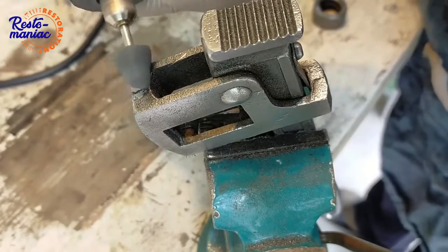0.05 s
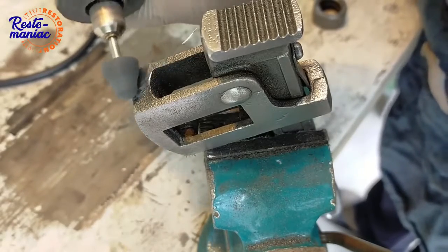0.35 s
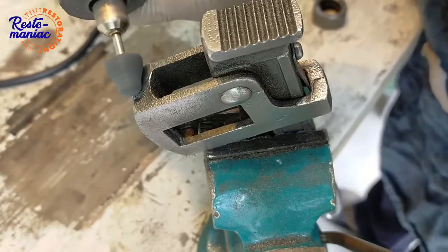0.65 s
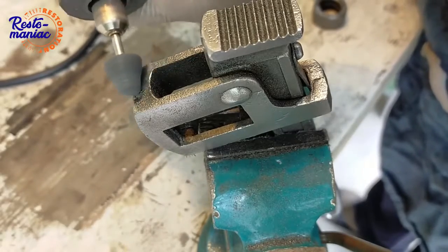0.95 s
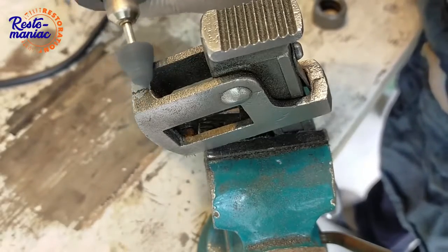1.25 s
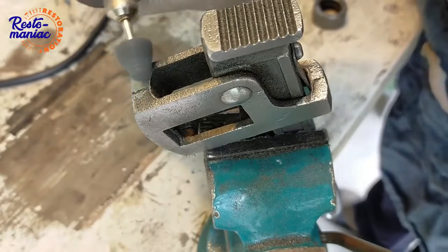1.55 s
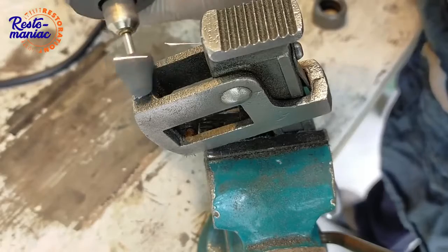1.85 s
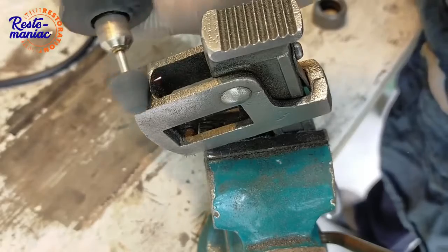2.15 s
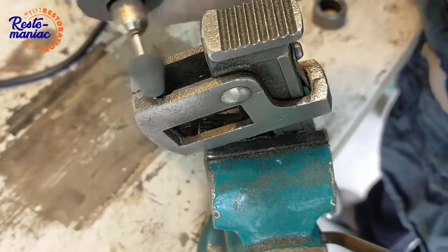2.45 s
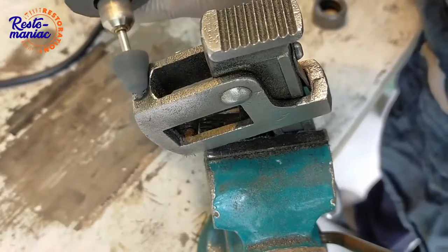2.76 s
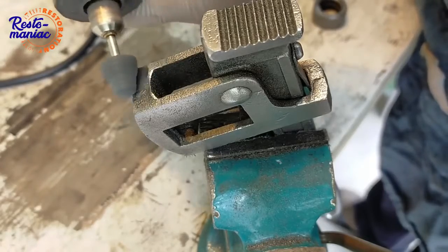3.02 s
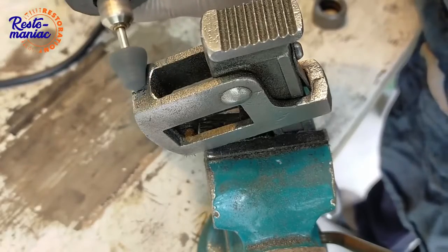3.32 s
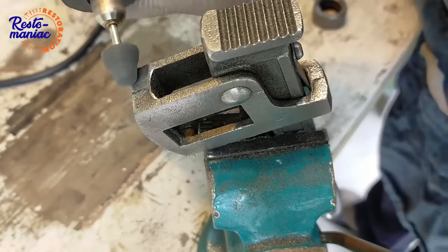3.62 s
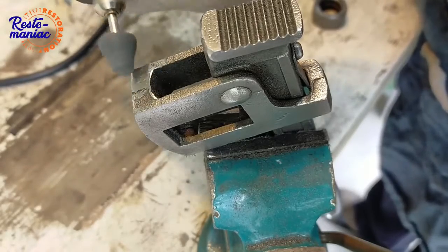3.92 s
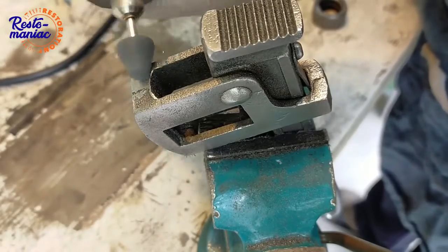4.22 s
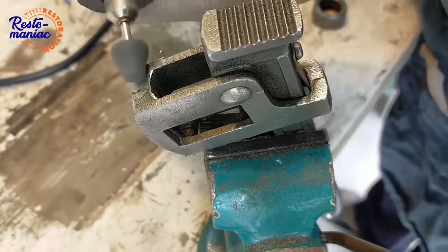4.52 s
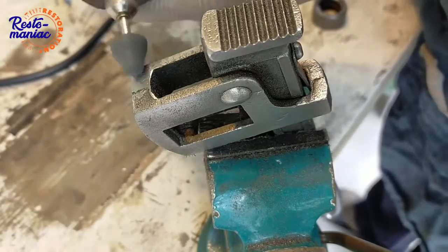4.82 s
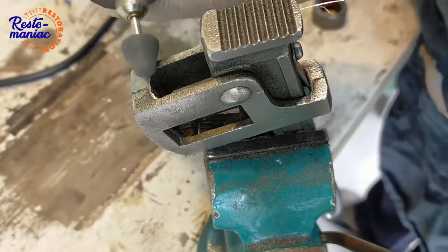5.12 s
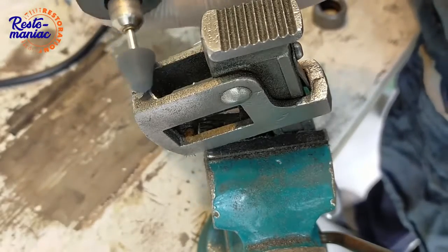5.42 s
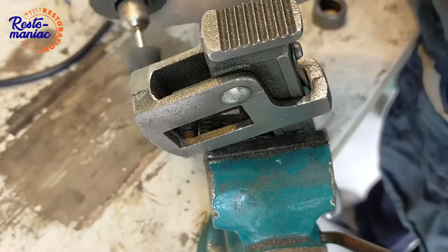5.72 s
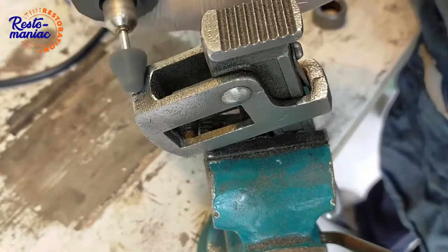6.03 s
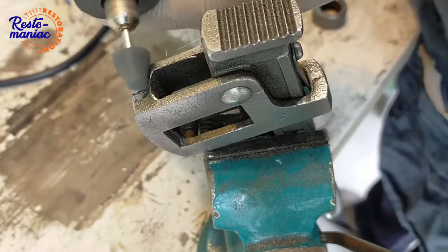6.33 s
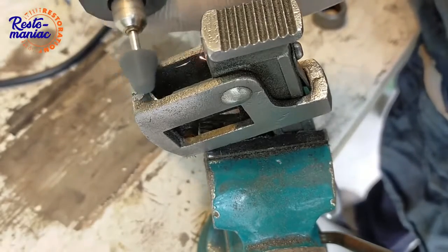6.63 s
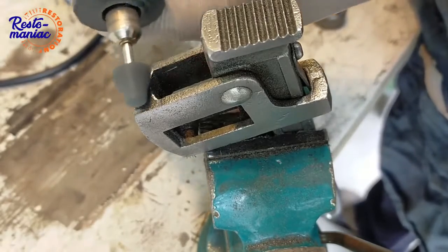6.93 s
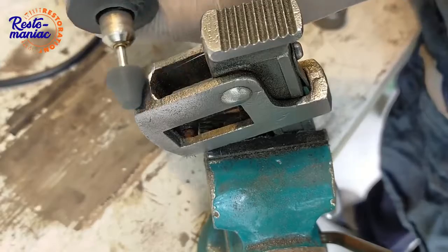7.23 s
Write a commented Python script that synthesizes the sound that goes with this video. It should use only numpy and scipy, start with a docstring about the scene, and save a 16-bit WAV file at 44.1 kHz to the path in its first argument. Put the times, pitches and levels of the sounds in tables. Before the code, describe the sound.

A small rotary tool whines close by, grinding steel with a gritty high screech, its pitch sagging under pressure and rising when lifted.

```python
"""Rotary tool grinding a wrench

A handheld tool grinds rust off a steel wrench in a vise, close by. The uneven stone scrapes
once a turn, so its whine sags under pressure; twice it lifts off and the motor races up.
As the hand presses and eases, the stone digs in, chatters and bounces.
Underneath: the motor's throbbing whirr, its cooling air, the bench and a quiet workshop."""
import sys
import numpy as np
from scipy import signal
from scipy.fft import rfft, irfft, next_fast_len
from scipy.io import wavfile
from scipy.ndimage import uniform_filter1d

SR = 44100
rng = np.random.default_rng(int(sys.argv[2]) if len(sys.argv) > 2 else 0)


def transcribe(u):
    """Save the signal u as a 16-bit wav file named by the first command-line argument.

    u: samples, shape (n,) or (channels, n), limited to [-1, 1]; the rate is SR.
    q: integer samples, one column per channel.
    """
    v = np.clip(np.atleast_2d(u).T, -1, 1)
    q = np.round(v * 32767).astype(np.int16)
    wavfile.write(sys.argv[1], SR, q)


N = 329427
TIME = np.arange(N) / SR

# spectrum of grains tearing steel: f/Hz, gain/dB
GRIT_SPECTRUM = [(300, -30), (900, -24), (1700, -14), (2200, -14), (2700, -10), (3400, -2), (4300, -2),
                 (5400, -2), (6500, -4), (8000, -7), (10000, -11), (15000, -10)]


def grinding(angle, tip, ease_db, grit_db):
    """Whine and grit ring through the steel while the stone touches it."""
    whine = from_db(ease_db) * steel_whine(angle, tip)
    grains = wrench(colour(loose_grit(angle), GRIT_SPECTRUM))
    grit = from_db(-47 + 3.5 * tip + grit_db + 0.65 * drift(4.7)) * rms_one(grains)
    judder_db = 1.3 * drift(22)  # stone bounces slightly in the hand
    return touching() * from_db(judder_db) * (whine + grit)


def steel_whine(angle, tip):
    """The steel radiates the scrape in four bands, each wavering on its own."""
    # stone strikes harder every second turn, growling an octave down: start/s, end/s, depth/1
    bounces = [(.24, .35, 0.2), (2.56, 2.79, 0.3), (4.5, 4.66, 0.1), (5.62, 5.815, 0.17), (6.1, 6.26, 1)]
    # radiation of stone and steel: f/Hz, gain/dB
    radiation = [(900, -22), (1500, -16), (2100, -13), (2800, -12), (3300, -6), (4400, 1.5), (5400, 0.5),
                 (6200, 0), (7200, 5), (9300, -3.5), (10200, -8), (11300, -3.5), (13000, -14.5),
                 (15500, -7.5)]
    # screech, drone, body ring, sizzle: low/Hz, high/Hz
    bands = [(3800, 6400), (950, 2400), (2400, 3800), (6400, 15700)]
    # stone digs in, steel sings: t/s, half-length/s, screech/dB, ring/dB
    digs = [(.05, 0.054, 1.5, 6.5), (.18, 0.045, 2, 4.5), (.44, 0.027, 6.5, -3), (.66, 0.091, 2.5, 3.5),
            (1.01, 0.019, 4.5, 8.5), (1.22, 0.17, 3, -5.5), (1.52, 0.038, 4.5, 8.5),
            (1.87, 0.056, 3.5, 1.5), (2.12, 0.17, 3, -0.5), (2.76, 0.08, 1, 9.5), (3.17, .04, 3, 3.5),
            (3.33, 0.083, 0.5, 6), (3.64, 0.13, 2.5, 1.5), (4.25, 0.01, 5.5, 9.5), (4.33, 0.022, -8, 9.5),
            (4.66, 0.032, 1, 8), (4.84, 0.035, 0.5, 8), (5.1, 0.033, 2, 3), (5.37, 0.031, 3.5, 8),
            (5.7, 0.059, 2.5, 4.5), (6.46, .025, 5, 5.5), (6.83, .03, -1, 6)]
    # low drone: t/s, level/dB
    drone = [(0, -57.5), (1.3, -59), (1.75, -54), (2.7, -54), (2.85, -60.5), (4.45, -61), (4.6, -52.5),
             (5.75, -51.5), (6.1, -48.5), (6.4, -51), (6.6, -49), (6.82, -44.5), (7.15, -53.5)]
    # treble sizzle: t/s, level/dB
    sizzle = [(.12, -43), (.35, -50), (1.65, -45.5), (2.3, -53), (3.65, -44.5), (4.15, -48), (5, -43.5),
              (5.45, -50), (5.75, -47), (6.1, -60), (6.8, -52), (7.4, -56)]
    bounce = 1 + np.clip(holds(bounces)[0], 0, 1) * np.cos(angle / 2)
    scrape = wrench(colour(bounce * stone_scrape(angle, tip), radiation))
    dig_screech_db, dig_ring_db = swells(digs)
    screech_db = -40.5 - 3 * tip + dig_screech_db
    ring_db = -46.5 - 0.24 * tip + dig_ring_db
    levels_db = [screech_db, curve(drone), ring_db, curve(sizzle)]
    return sum(from_db(db + 1.28 * drift(16)) * steady(band(scrape, low, high, order=5))
               for (low, high), db in zip(bands, levels_db))


def stone_scrape(angle, tip, patchy_db=5.0, wear_db=1.3):
    """Bumps repeat every turn; each harmonic swells and slips as the contact point wanders."""
    # worn stone profile: bumps/turn, flank/dB, tip/dB
    profile = [(2, -4.5, -5), (3, -2.5, 5), (4, 0, 2.5), (5.1, 1, 10.5), (6, 2.5, 6.5), (7, 0.5, 5.5),
               (8.15, 0, 3), (8.98, -2.5, 5), (10.03, -2, -11.5), (10.95, -2.5, -3.5), (14.6, 4, -11),
               (31.7, 15.5, -4)]
    orders, flank_db, tip_db = np.transpose(profile)
    scrape = 0
    for k in range(2, 33):
        profile_db = (1 - tip) * np.interp(k, orders, flank_db) + tip * np.interp(k, orders, tip_db)
        slip_rad = (.3 + .027 * k) * drift(55)
        swell_db = wear_db * drift(1.5) + patchy_db * drift(20)
        phase = k * angle + slip_rad + rng.uniform(0, 2 * np.pi)
        scrape += from_db(profile_db + swell_db) * np.cos(phase)
    return rms_one(scrape)


def loose_grit(angle, grains_per_s=18000, spread_db=1.2, bite=0.45):
    """Single grains tear at the steel, hardest when the stone's high side comes round."""
    grains = (rng.random(N) < grains_per_s / SR) * rng.standard_normal(N)
    sizes = from_db(spread_db * np.minimum(rng.exponential(1, N), 4))
    return rms_one(grains * sizes * (1 + bite * np.cos(angle)))


def wrench(x):
    """The steel's modes lift whatever sweeps through them."""
    # wrench modes: f/Hz, width/Hz, gain/dB
    modes = [(1383, 17, 3), (1738, 106, 2), (2928, 164, 1.5), (3448, 310, 4.5), (4113, 12, 13),
             (4950, 560, 3), (5520, 30, 9.5)]
    return x + ring(x, modes)


def touching():
    """Contact gain: fades as the stone lifts, returns quickly to 1 as it lands."""
    # stone clear of the steel: start/s, end/s, fade/s, landing/s
    lifts = [(3.81, 4.068, .035, .014), (5.817, 6.087, .006, .001)]
    gain = 1
    for start, end, fade, landing in lifts:
        leaving = np.exp(-np.maximum(TIME - start, 0) / fade) * (TIME < end)
        gain *= leaving + np.clip((TIME - end) / landing, 0, 1)
    return gain


def catches(decay_s=0.0023):
    """Hard grains snag on an edge with a short crack."""
    # snags: t/s, level/dB
    snags = [(2.569, -40), (5.812, -39), (6.088, -31), (6.206, -36)]
    blows = sum(from_db(db) * (TIME >= t) * np.exp(-np.abs(TIME - t) / decay_s) for t, db in snags)
    return blows * rms_one(colour(rng.standard_normal(N), GRIT_SPECTRUM))


def whirr(angle, speed_hz, tip, rattle_db, ripple_hz=200, throb=.45):
    """The motor rattles its housing about eight times a turn, throbbing with the supply ripple."""
    rattle = np.cos(8 * angle) * (.6 + drift(420)) + np.sin(8 * angle) * drift(420)
    housing = resonance(rattle, hz=4800, width_hz=1300)
    housing = steady(band(housing, 4000, 5700), samples=400)
    bursts = 1 + throb * np.cos(2 * np.pi * ripple_hz * TIME + 0.22 * drift(30))
    speed_db = -0.5 * np.log2(speed_hz / speed_hz.mean())  # bearings run smoother when fast
    level_db = -50 + 1.5 * tip + speed_db + rattle_db + 0.5 * drift(4.1)
    return from_db(level_db) * rms_one(housing * bursts)


def unbalance(angle, speed_hz, tip, boom_hz=676, half_width_hz=71):
    """Spindle hum with a faint half-speed line; through the tip it drives a bench resonance."""
    half_speed = from_db(-15 + 4 * drift(4)) * np.cos(angle / 2 + drift(10))
    boom_db = 18 * tip ** 2 / (1 + ((speed_hz - boom_hz) / half_width_hz) ** 2)
    level_db = -75 - 2.5 * tip + boom_db + 4.1 * drift(28.5)
    return np.sqrt(2) * from_db(level_db) * (np.cos(angle) + half_speed)


def motor(angle, speed_hz, nominal_hz=570):
    """High tones and cooling air, both growing with speed."""
    # motor tones: cycles/turn, rms at nominal speed/dB
    harmonics = [(3, -70), (4, -64), (10, -59), (16, -60), (18, -68), (21, -62.5), (22, -84), (24, -69),
                 (25, -95)]
    # cooling air: f/Hz, gain/dB
    air_spectrum = [(300, -16), (700, -14), (1200, -5), (2200, -4), (2700, -1), (3600, -2), (5200, 2),
                    (6800, -2), (8300, -4), (11000, 0), (12800, -2), (15000, 2)]
    tones = sum(from_db(db + 3 * drift(12)) * np.cos(k * angle + .9 * drift(70)) for k, db in harmonics)
    rush = rms_one(colour(band(rng.standard_normal(N), 280, 17000), air_spectrum))
    air = from_db(-51.7 + 1.8 * drift(9)) * rush
    return speed_hz / nominal_hz * (np.sqrt(2) * tones + air)


def bench(grit_db):
    """The bench murmurs as the stone chatters and thuds dully when it slips."""
    # bench jolts: t/s, level/dB, half-length/s
    jolts = [(4.78, -82, 0.077), (5.031, -59, 0.016), (5.813, -67, 0.012), (5.845, -58.5, 0.065),
             (6.113, -72, 0.02)]
    # bench modes: f/Hz, width/Hz, gain/dB
    modes = [(32.2, 18, 1.5), (131, 79, -6.5), (240.4, 22, -5), (400, 260, -10), (654, 34, -2)]
    murmur = from_db(-77 + 0.92 * grit_db + 3.7 * drift(36))
    thuds = sum(from_db(db) * np.exp(-((TIME - t) / half_s) ** 2) for t, db, half_s in jolts)
    return (murmur + thuds) * rms_one(ring(rng.standard_normal(N), modes))


def workshop(level_db=-72.5):
    """Faint, steady room rumble."""
    # rumble: f/Hz, gain/dB
    spectrum = [(15, 17.5), (35, -14), (55, -4), (110, -4), (200, -36), (250, -21), (330, -3.5), (500, -32),
                (1100, -41)]
    return from_db(level_db) * rms_one(colour(rng.standard_normal(N), spectrum))


def from_db(db):
    """Amplitude gain."""
    return 10 ** (np.asarray(db) / 20)


def rms_one(x):
    """Scale to unit power."""
    return x / np.sqrt(np.mean(x ** 2) + 1e-20)


def steady(x, samples=1500):
    """Hold short-term power at 1."""
    return x / np.sqrt(np.maximum(uniform_filter1d(x * x, samples), 1e-12))


def curve(rows):
    """Interpolate (t/s, value) rows at every sample."""
    return np.interp(TIME, *np.transpose(rows))


def swells(rows):
    """Summed Gaussian swells, one curve per size column."""
    return sum(np.outer(sizes, np.exp(-np.minimum(((TIME - t) / half_s) ** 2, 50)))
               for t, half_s, *sizes in rows)


def holds(rows, ramp_s=0.021):
    """Summed ramped steps, one curve per size column."""
    return sum(np.outer(sizes, np.clip(np.minimum(TIME - start, end - TIME) / ramp_s + .5, 0, 1))
               for start, end, *sizes in rows)


def drift(rate_hz):
    """Low-passed random wander, rms 1."""
    hop = 20
    pole = np.exp(-2 * np.pi * rate_hz * hop / SR)
    noise = rng.standard_normal(N // hop + 2002)
    slow = signal.lfilter([1], [1, -2 * pole, pole * pole], noise)[2000:]
    return np.interp(np.arange(N) / hop, np.arange(len(slow)), rms_one(slow))


def colour(x, spectrum):
    """Filter by (f/Hz, gain/dB) points."""
    size = next_fast_len(N + 4096)
    hz, db = np.transpose(spectrum)
    bins_hz = np.maximum(np.arange(size // 2 + 1) * SR / size, 1)
    gain = from_db(np.interp(np.log(bins_hz), np.log(hz), db))
    return irfft(rfft(x, size) * gain, size)[:N]


def band(x, low_hz, high_hz, order=2):
    """Butterworth band-pass."""
    return signal.sosfilt(signal.butter(order, [low_hz, high_hz], "band", fs=SR, output="sos"), x)


def resonance(x, hz, width_hz):
    """Two-pole resonator, peak gain 1."""
    r = np.exp(-np.pi * width_hz / SR)
    feedback = [1, -2 * r * np.cos(2 * np.pi * hz / SR), r * r]
    return signal.lfilter(np.array([1, 0, -1]) * (1 - r * r) / 2, feedback, x)


def ring(x, modes):
    """Parallel resonators."""
    return sum(from_db(db) * resonance(x, hz, width_hz) for hz, width_hz, db in modes)


def scene():
    """One spindle angle drives stone and motor; all sources sit in the centre."""
    # spindle speed, slowed by hand pressure: t/s, f/Hz
    spindle = [(0.0, 687.0), (0.12, 642.5), (0.23, 630.1), (0.5, 549.5), (0.66, 579.4), (0.96, 564.5),
               (1.06, 577.3), (1.23, 554.7), (1.31, 515.6), (1.66, 592.2), (1.81, 609.2), (2.04, 545.2),
               (2.29, 546.7), (2.56, 583.3), (3.06, 568.6), (3.27, 514.3), (3.56, 496.3), (3.7, 514.5),
               (3.87, 577.1), (3.91, 648.6), (4.02, 711.0), (4.12, 746.2), (4.2, 749.1), (4.47, 643.9),
               (4.66, 604.8), (4.89, 584.1), (5.22, 619.5), (5.35, 592.2), (5.62, 475.6), (5.84, 448.8),
               (5.91, 538.2), (6.01, 629.9), (6.1, 682.2), (6.16, 678.8), (6.64, 579.8), (7.03, 554.4),
               (7.41, 586.3), (7.47, 570.0)]
    # contact point on the stone: t/s, position (0 flank, 1 tip)
    contact = [(3.8, 0), (4.1, .7), (5.8, .7), (6.1, 1)]
    # hand eases: start/s, end/s, whine/dB, grit and rattle/dB
    eases = [(.5, .61, -0.5, -4), (1.33, 1.46, 0, -7), (2.49, 2.54, -2.5, -1), (2.8, 2.92, -2.5, -7),
             (2.97, 3.06, -5.5, -2), (3.35, 3.44, -2.5, -11), (3.46, 3.62, 0.5, -7),
             (4.12, 4.22, -2.5, -10), (4.38, 4.44, -2.5, -6), (5.45, 5.5, -1, -5), (5.822, 5.86, 10, 0),
             (6.14, 6.2, 0, -2), (6.65, 6.71, -2, -14), (7.24, 7.32, 0.5, -5)]
    # grit and rattle as the stone chatters, motor rattle alone as it spins up free:
    # start/s, end/s, grit/dB, rattle/dB
    rough_spells = [(.06, .15, 3, 1), (.24, .35, 4.5, -2), (.39, .5, 2, 8), (.92, 1.16, -2.5, 3),
                    (1.19, 1.32, -3, 12), (1.66, 1.84, 0.5, 3), (1.86, 1.98, 4.5, 5), (2.0, 2.48, 5, 3),
                    (2.55, 2.66, 7.5, 4), (2.69, 2.795, 4.5, 4), (3.07, 3.13, -1, 9), (3.21, 3.32, 2, 8),
                    (3.7, 3.8, -3, 6.5), (3.855, 3.93, 12, 9), (4.44, 4.68, 1, -3.5),
                    (5.795, 5.825, 10, -7), (5.87, 6.06, 0, 6.5), (6.09, 6.31, 0, -1)]
    speed_hz = curve(spindle) * (1 + .003 * drift(14))  # unsteady hand
    angle = 2 * np.pi * np.cumsum(speed_hz) / SR
    tip = curve(contact)
    ease_db, calm_db = holds(eases)
    grit_db, rattle_db = holds(rough_spells) + calm_db
    mix = whirr(angle, speed_hz, tip, rattle_db)
    mix += grinding(angle, tip, ease_db, grit_db) + catches()
    mix += unbalance(angle, speed_hz, tip) + motor(angle, speed_hz)
    mix += workshop() + bench(touching() * grit_db)
    return np.array([mix, mix])


def record(dry, cutoff_hz=15750):
    """Steep elliptic low-pass."""
    return signal.sosfilt(signal.ellip(12, .1, 80, cutoff_hz, fs=SR, output="sos"), dry)


dry = scene()
out = record(dry)
transcribe(out)
```